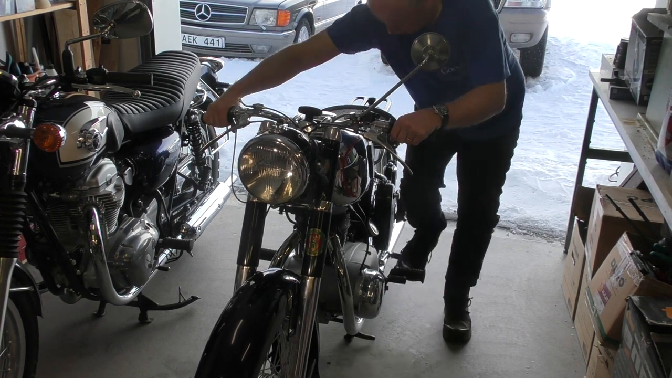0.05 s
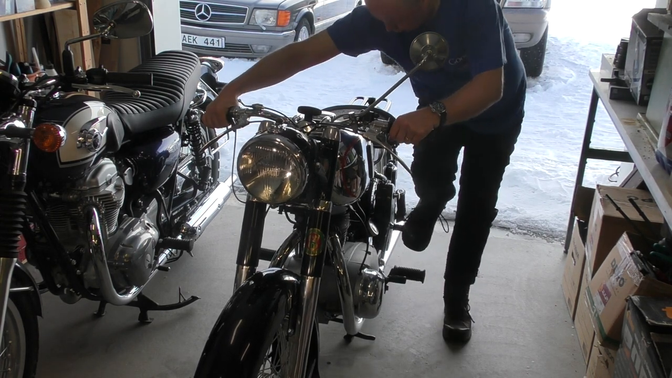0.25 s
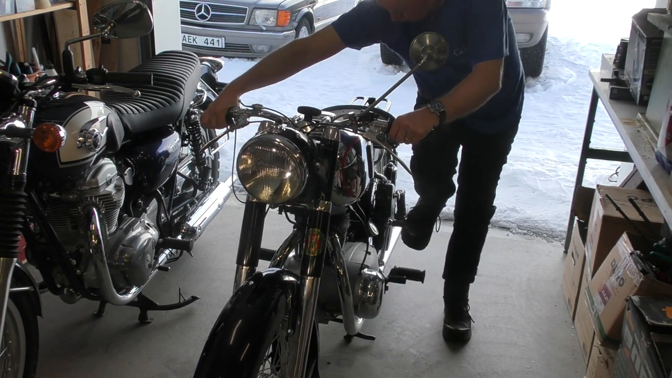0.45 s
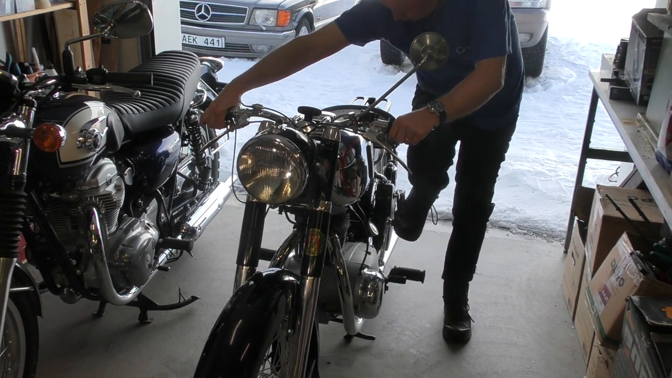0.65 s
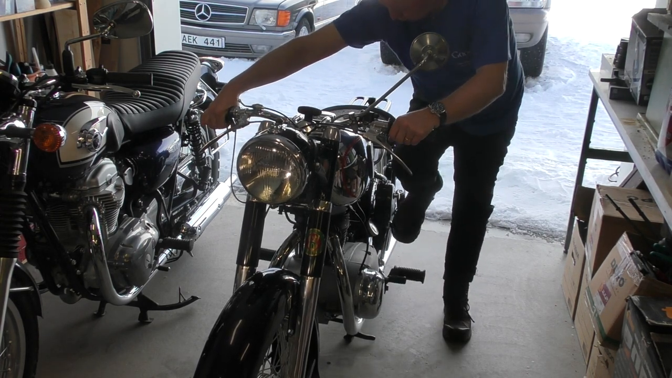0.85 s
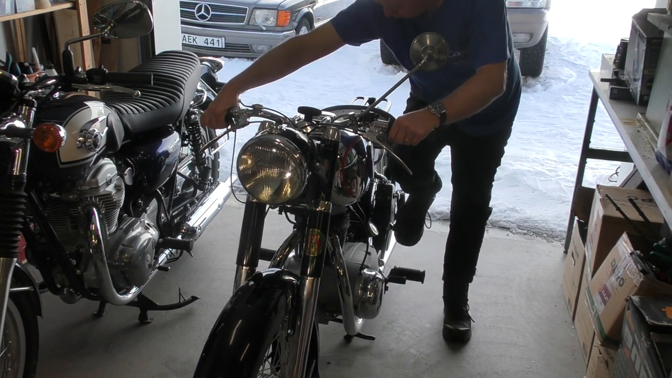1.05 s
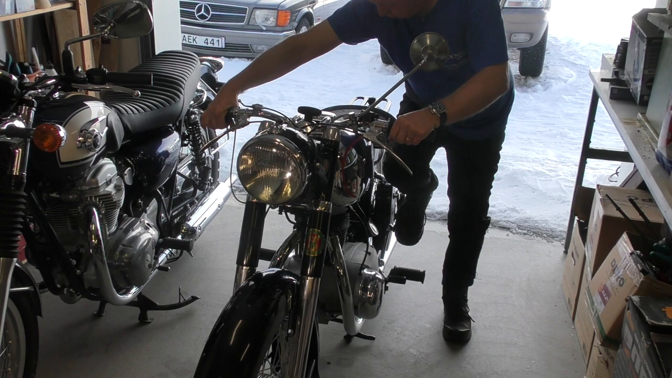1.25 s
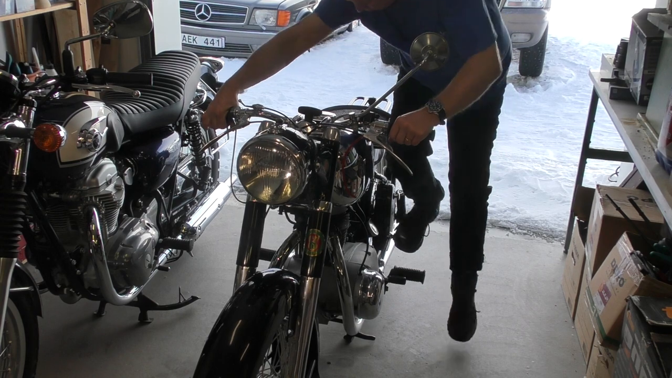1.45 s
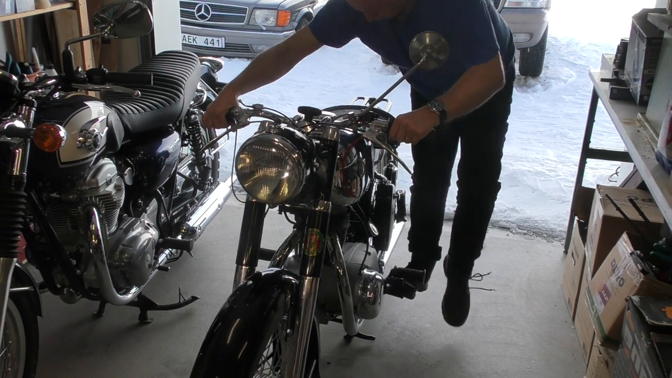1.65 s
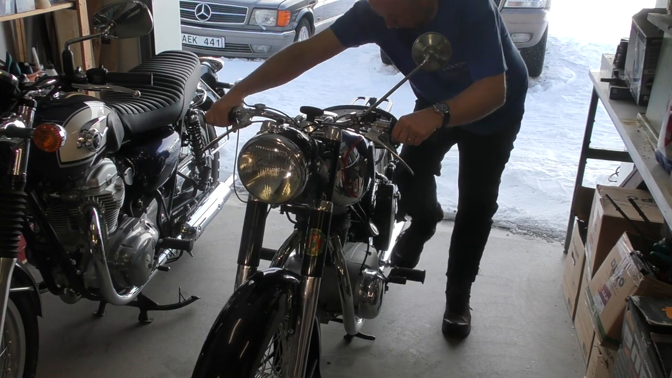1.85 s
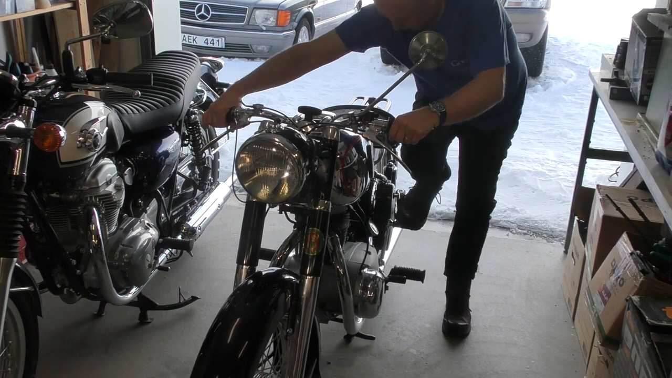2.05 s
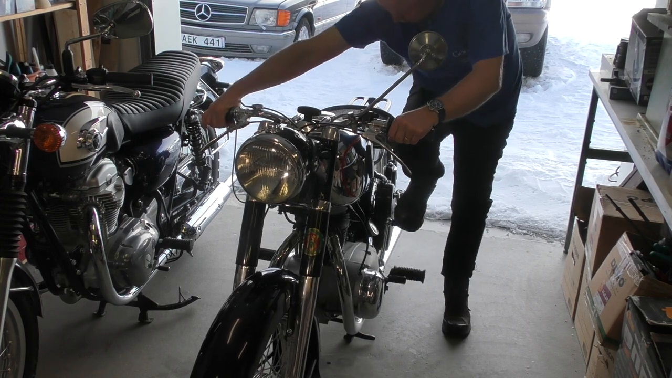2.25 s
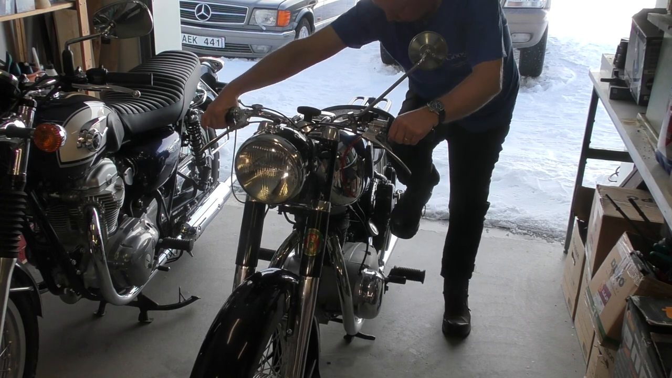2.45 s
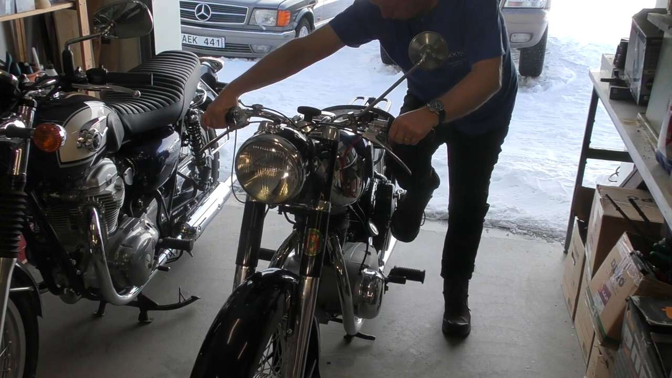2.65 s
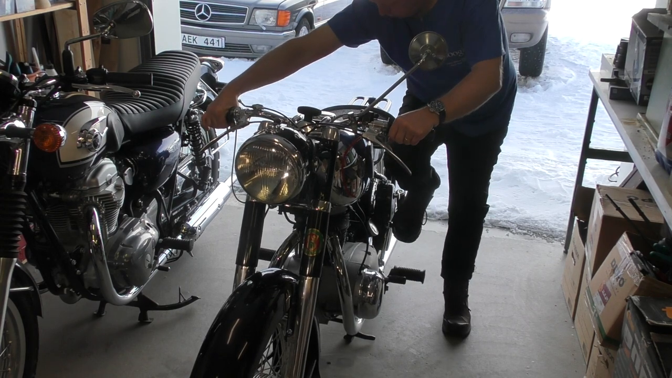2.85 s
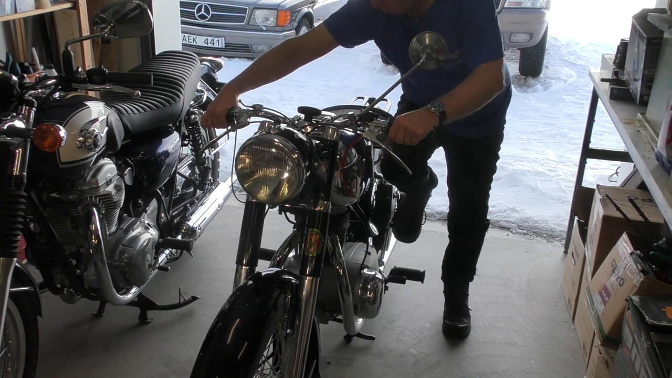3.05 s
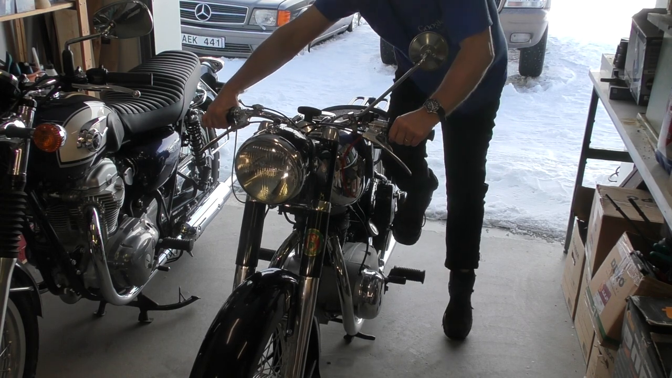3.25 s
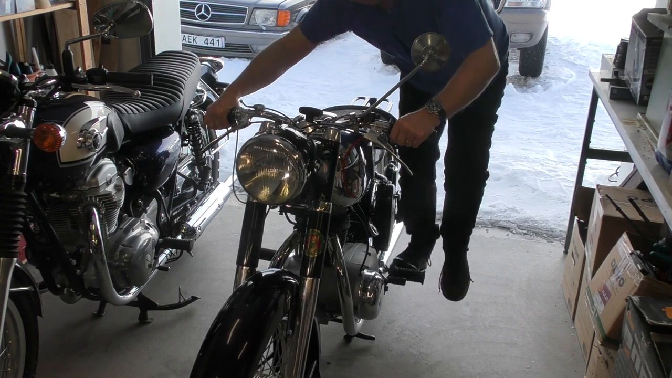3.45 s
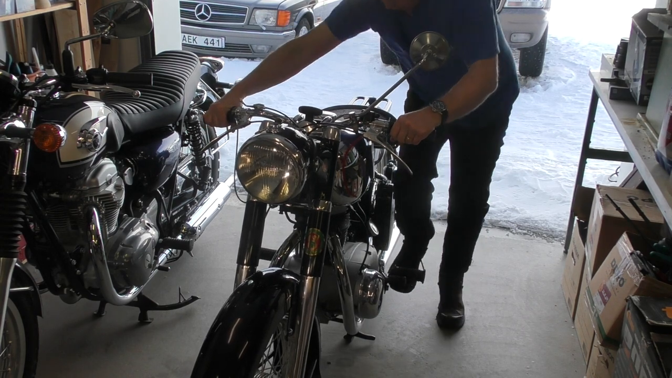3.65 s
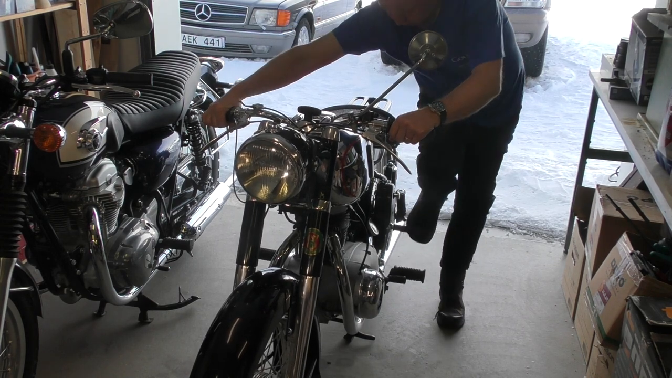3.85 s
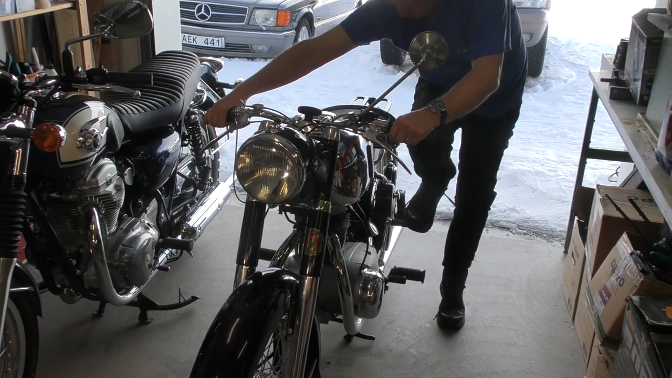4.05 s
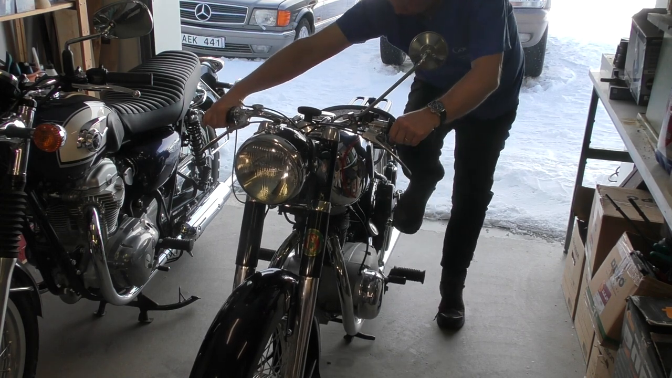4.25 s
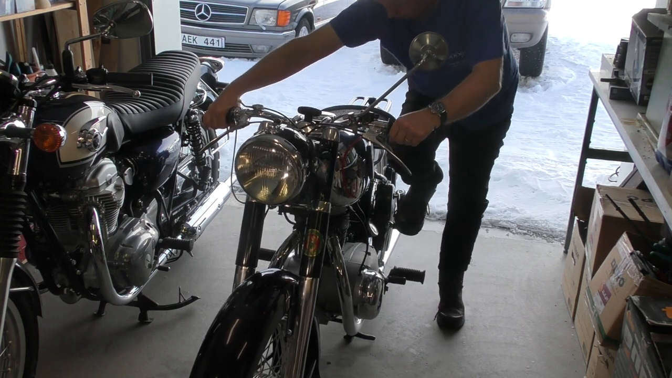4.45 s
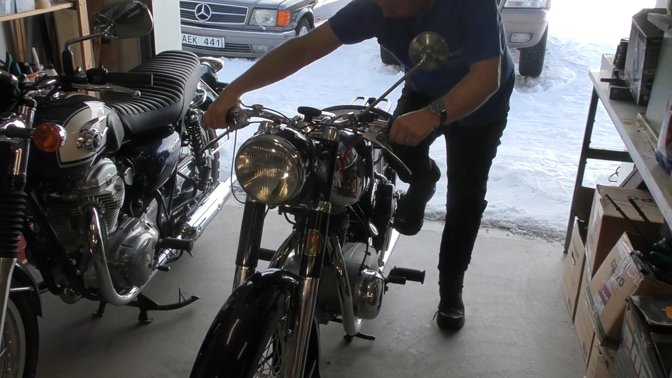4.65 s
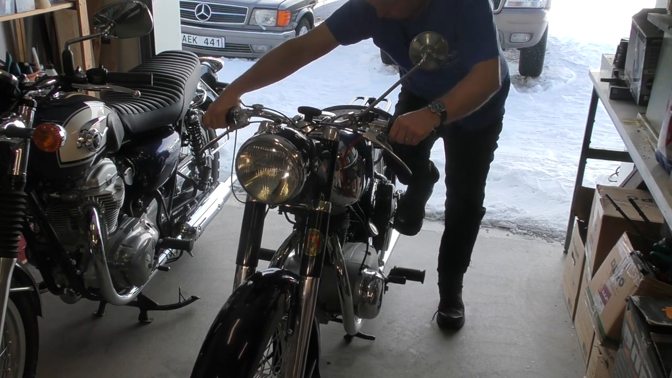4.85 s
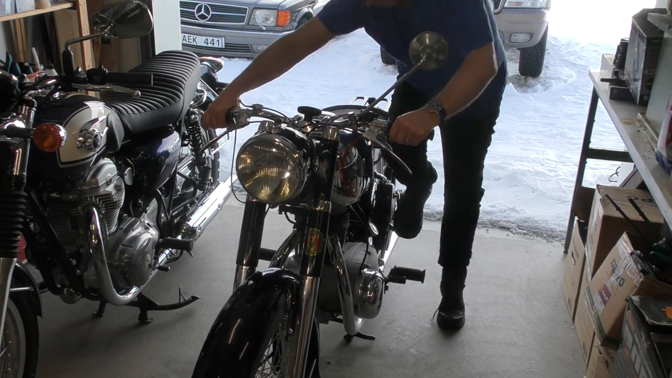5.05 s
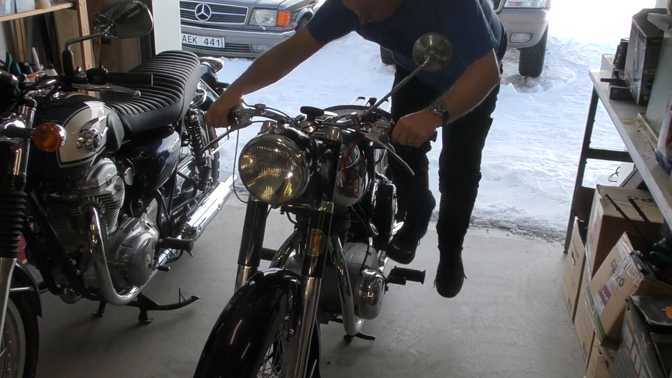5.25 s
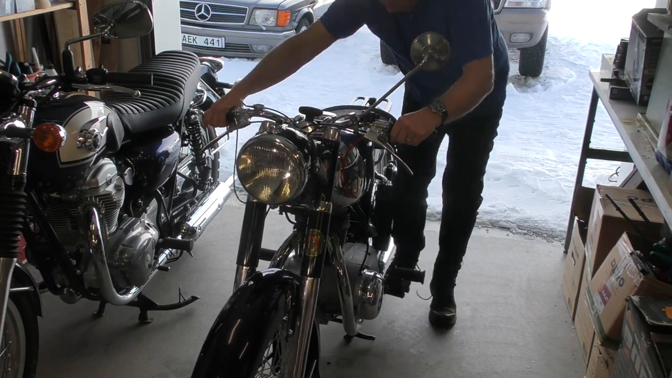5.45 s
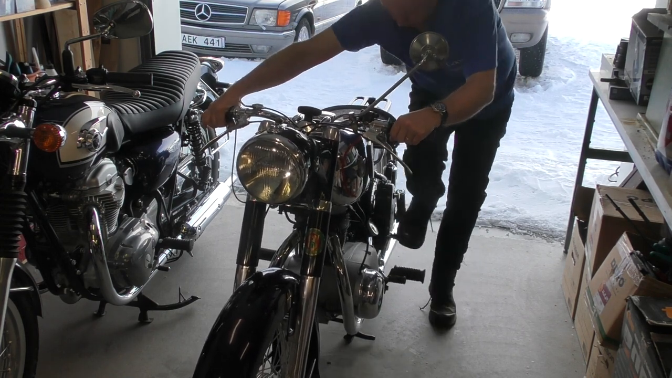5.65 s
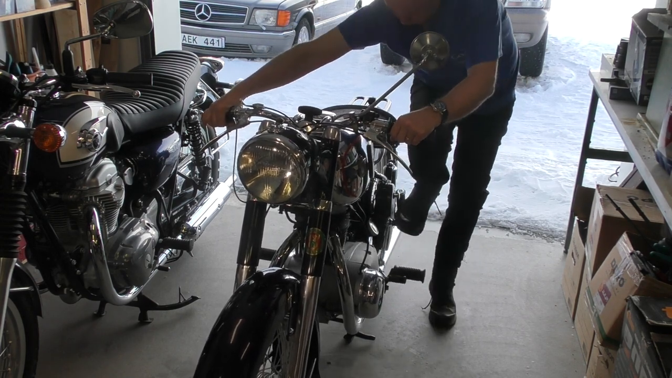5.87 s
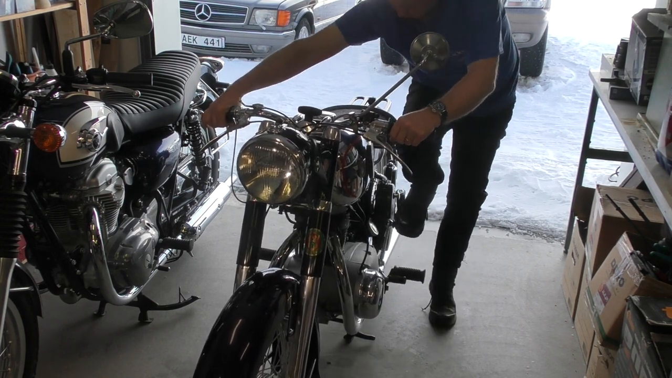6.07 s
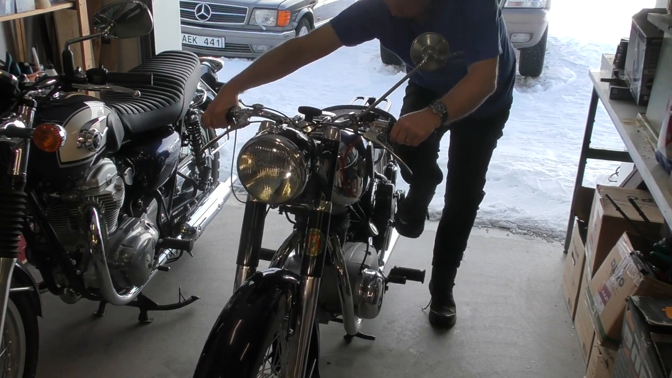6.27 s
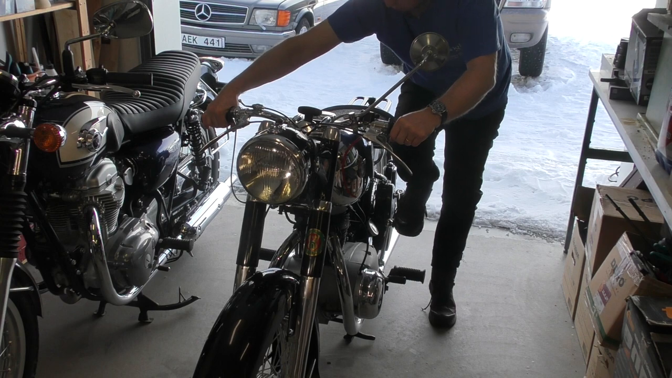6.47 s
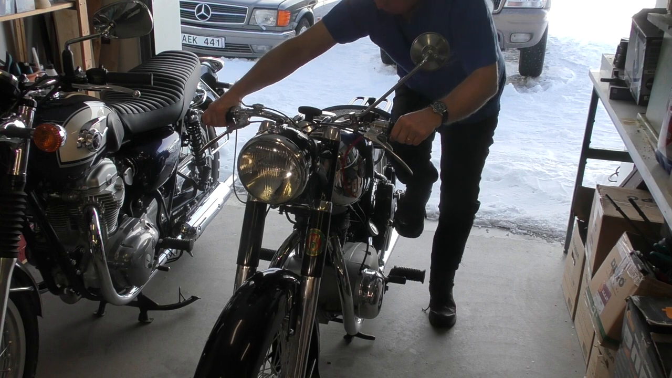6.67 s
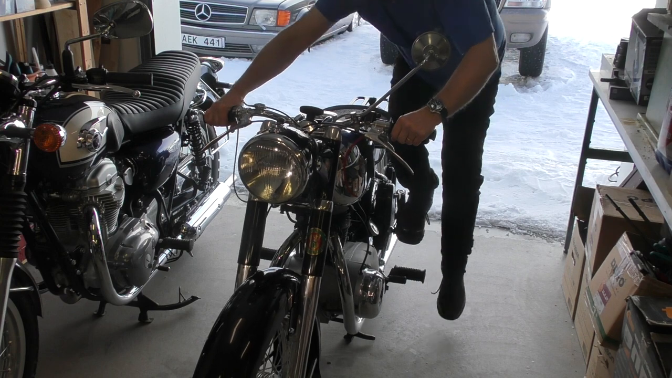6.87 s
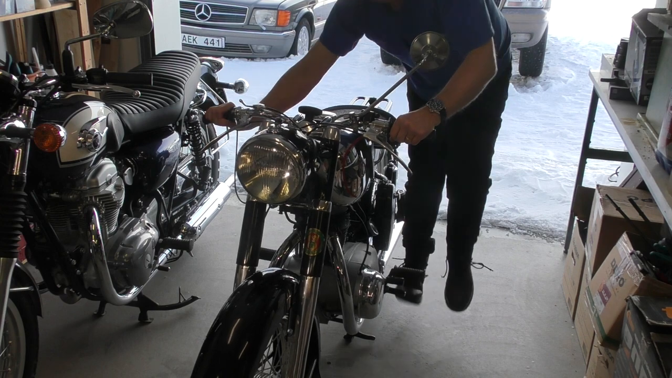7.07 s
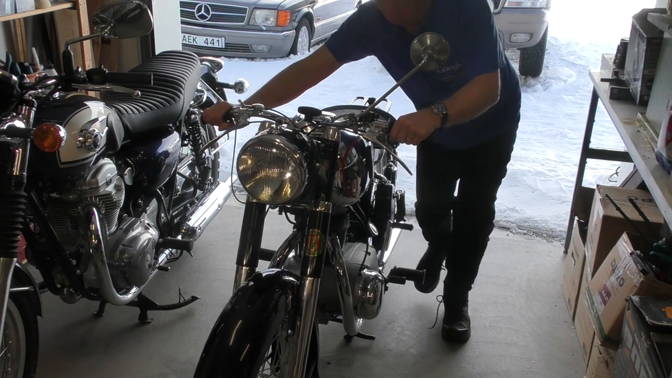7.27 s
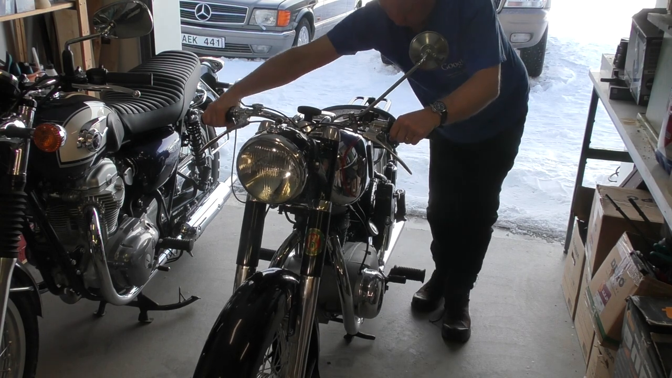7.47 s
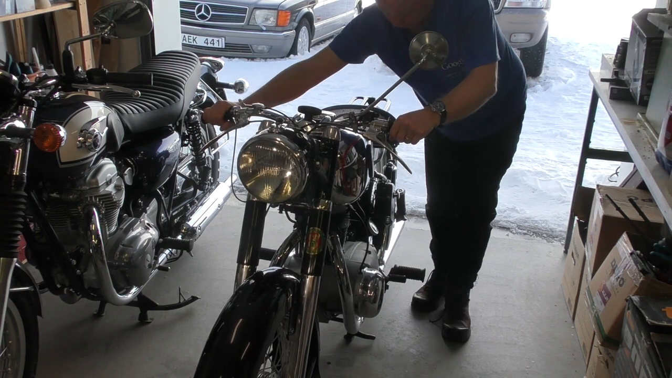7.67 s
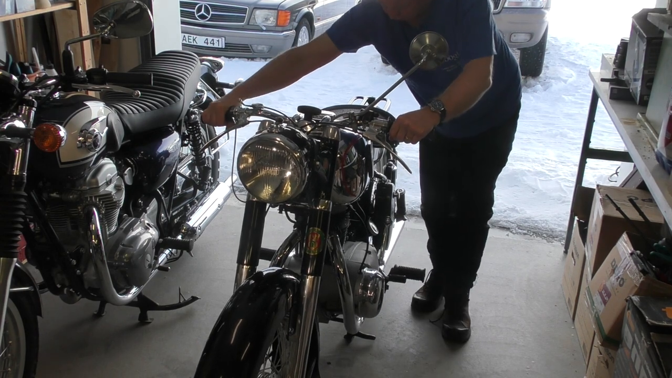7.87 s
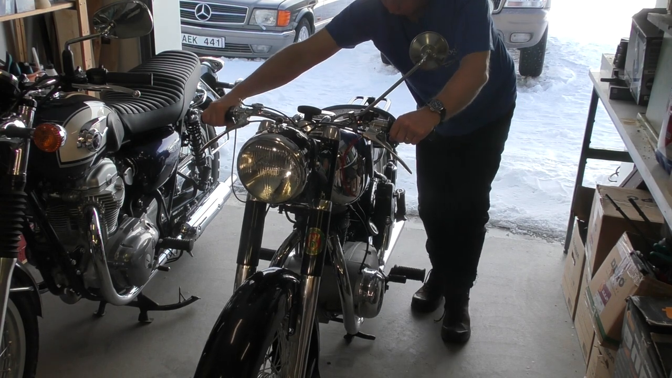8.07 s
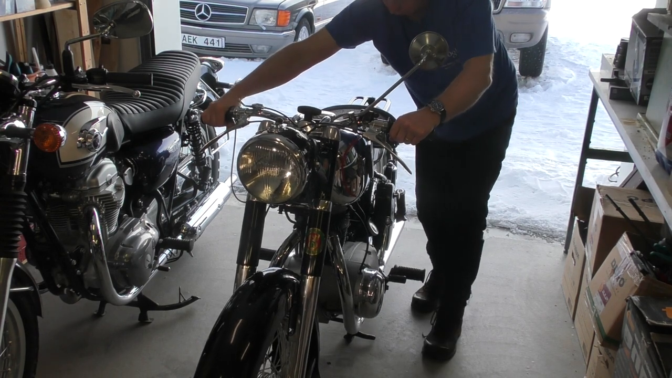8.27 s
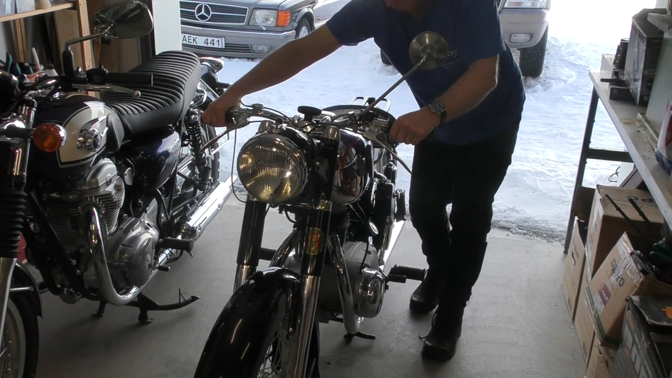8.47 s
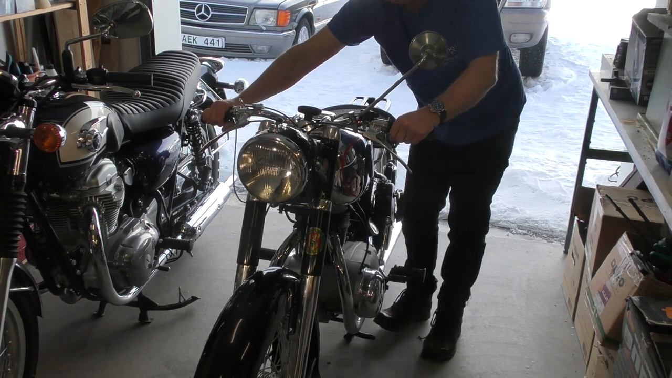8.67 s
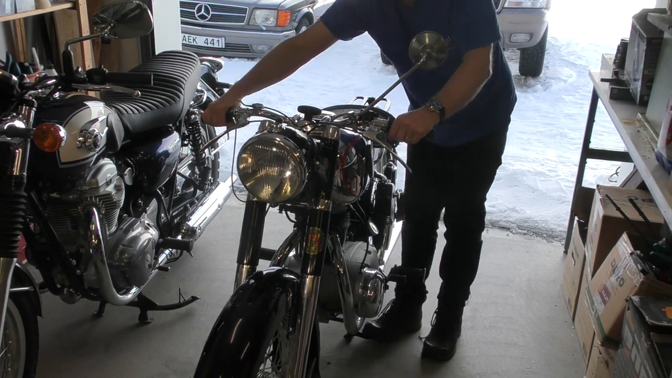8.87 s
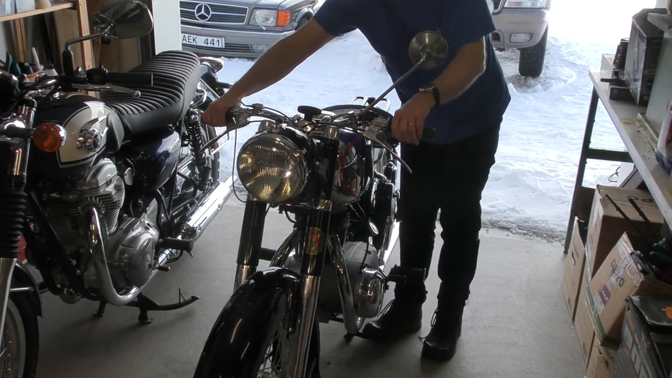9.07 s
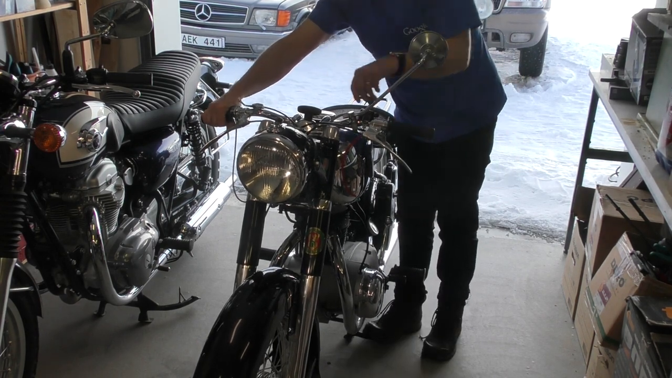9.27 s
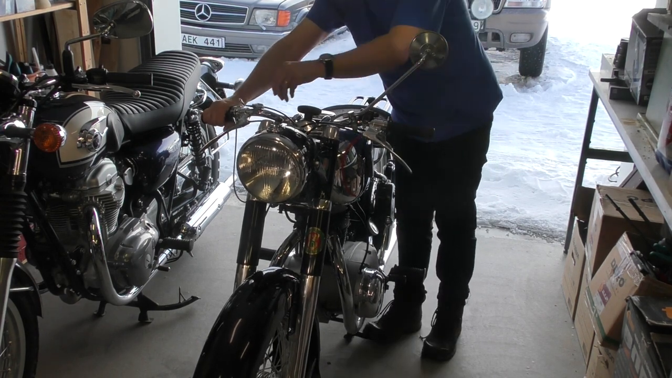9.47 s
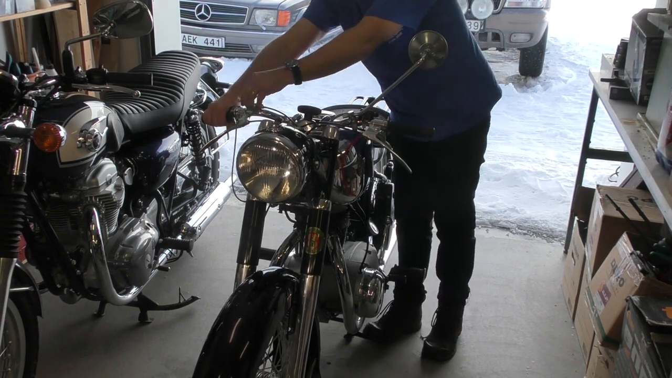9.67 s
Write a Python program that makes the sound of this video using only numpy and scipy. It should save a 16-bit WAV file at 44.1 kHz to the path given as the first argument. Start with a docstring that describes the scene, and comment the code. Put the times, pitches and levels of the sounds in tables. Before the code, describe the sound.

A single-cylinder motorcycle is kick-started close by in a garage, slightly to the left, over a faint low hum. It opens on a rasp of gears and a loud clack as the lever snaps back. A second kick scrapes and ratchets from about 1.5 seconds, with a dull exhaust chuff, ending in a clack and a spring jingle at 2.1. A third follows from 3.3, slamming back at 3.9, and a fourth rasps from about 5.1 to 6. Small knocks and soft thuds fill the pauses. The fifth kick begins near 6.9 seconds with sharp clacks, and the engine fires at about 7.2. From 7.5 it runs, uneven at first, then settling into a quick, thumping idle with clattering valves and mechanical rasp until the end, near 9.7 seconds.

```python
"""Motorcycle kick-start in an open garage.

A single-cylinder engine is kicked over four times and catches on the fifth kick. Lever, ratchet and gears
rasp and knock in the crankcase, the return spring jingles, the valves clatter, the exhaust thumps in three
puffs a firing. A low hum throbs behind; loud clacks make the recorder turn its bass down."""
import sys
import numpy as np
from scipy import signal
from scipy.fft import rfft, irfft, next_fast_len
from scipy.io import wavfile
from scipy.ndimage import uniform_filter1d

SR = 44100
rng = np.random.default_rng(int(sys.argv[2]) if len(sys.argv) > 2 else 0)


def bounce(signal):
    """Save signal as a 16-bit WAV file at the path given by the first command-line argument."""
    frames = np.transpose(np.atleast_2d(signal))
    limited = np.clip(frames, -1, 1)
    pcm = np.round(limited * 32767).astype(np.int16)
    wavfile.write(sys.argv[1], SR, pcm)


N = 428652

# (time [s], blast [dB], suction delay [ms], suction [dB re blast], further delay [ms],
#  last suction [dB re blast])
FIRINGS = [(7.235, -11.5, 12, -7, 11.7, -3), (7.5172, -7.5, 11.7, -10, 11, -7),
           (7.61, -18.5, 12.2, 4, 9.8, -7), (7.6771, -8.5, 11.0, -18, 11, -7.5),
           (7.744, -13.5, 20.5, 0.5, 13, -9), (7.8085, -15, 13, 0.5, 8.2, -3),
           (7.912, -21.5, 13.4, 10.5, 13.7, 11), (7.981, -32, 18.5, 11, 12.5, 8),
           (8.0435, -12.5, 12.4, 0.5, 8.7, -6), (8.101, -14.5, 12.4, 3.5, 8, -4),
           (8.158, -21, 11.5, 8.5, 10, -11), (8.213, -15, 12, 2.5, 10.3, -7),
           (8.2675, -14.5, 11.5, 2, 16, -13), (8.322, -14, 10.9, 3.5, 15, -12),
           (8.374, -15.2, 11.5, 4.5, 15, -11), (8.4274, -23, 11.6, 1, 14.1, -17),
           (8.489, -17, 10, 2, 14, -6), (8.5486, -17.5, 10.2, 3, 13, 1),
           (8.6152, -22.5, 9.4, 8.5, 9.7, -5.5), (8.675, -18.5, 12, 3, 7.7, -8),
           (8.7403, -14, 12.7, -4, 8.5, -2.5), (8.778, -23, 22, 10, 10.8, 11.5),
           (8.8524, -16, 11, 3.5, 15.5, -3), (8.9018, -16.5, 11.1, 0.5, 14.8, -9),
           (8.9486, -26, 10.2, 13, 14.6, 7.7), (9.0024, -20.5, 7.5, 4, 14.2, 3),
           (9.0488, -18.5, 10.2, 0.5, 13.2, -1.9), (9.1006, -18, 10.5, 1.5, 13.7, 1),
           (9.154, -20, 10.8, 2.5, 13.0, -3), (9.2044, -22.5, 12.8, 3, 4.5, 7),
           (9.269, -21, 10.7, 3.5, 13, -1), (9.33, -23, 11.2, 2.5, 13.5, -2),
           (9.3899, -24, 12, 5.5, 4.3, 4), (9.4603, -25, 11.8, 4, 11.5, 2), (9.5232, -21, 17.5, 4, 18, -3),
           (9.589, -13.5, 17.7, 1, 19, -11.1), (9.6491, -14, 12.3, 2, 9.8, -4.5),
           (9.7031, -16, 10.7, -0.5, 12.0, -8.0)]
# engine under power: (time [s], rasp [dB], treble [dB re rasp], pipe rumble [dB], valve clatter [dB])
RUNNING = [(7.5, -36.5, -0.5, -12, -20.5), (7.74, -35.5, 1.5, -9.5, -20), (7.95, -33, -4, -6.5, -21.5),
           (8.17, -32, -4, -10.5, -26.5), (8.62, -31.5, -8.5, -20, -32), (8.72, -30, 0.5, -5.5, -23.5),
           (8.94, -32.5, -5, -13.5, -29), (9.4, -31.5, -9, -14, -34), (9.55, -32, -1.5, -8.5, -20),
           (9.72, -35, 0.5, -8.5, -24.5)]
# lever slams home: (time [s], sizzle [dB], spring jingle [dB], first jingle pitch [Hz], arm ring [dB])
SLAMS = [(0.15, -23.5, -33, 12500, -39), (2.145, -22.5, -9, 11700, -41.5),
         (3.933, -21.5, -15, 11100, -40.5)]
# spectra of scraping metal, its hiss and pumped air: (frequency [Hz], density [dB])
RASP = [(280, -32.5), (480, -10.5), (777, -10.5), (1350, -0.5), (1950, -5), (2500, 0.5), (3160, -4.5),
        (3780, -3), (7000, -13.5), (9100, -37.5), (15400, -120)]
TREBLE = [(3530, -10.5), (6000, -3.5), (7340, -4), (8000, -1), (11400, -4.5), (15000, -11), (16000, -0.5)]
AIR = [(18, -39.5), (30, -26.5), (54, -6.5), (81, -12), (141, -6), (312, -3), (369, -4.5), (425, -2),
       (602, -18.5), (650, -16.5), (840, -33), (1430, -120)]


def exhaust():
    """A firing is a blast and two suctions, a chuff one puff; puffs and gas flow ring the pipe."""
    # compression while turned over: (time [s], level [dB], deep part [dB re level])
    chuffs = [(1.773, -14, -22), (3.423, -36, -33), (3.663, -20, -30.5), (3.76, -27, -38),
              (3.83, -26.5, -40), (5.327, -31.5, -35), (5.493, -13, -33), (5.729, -31, -40),
              (7.137, -16.5, -16)]
    pipe_modes = [(74.8, 6.1, 2.5), (148, 37, 1), (214.5, 43, 2)]  # (frequency [Hz], width [Hz], gain [dB])
    silencer_ring = [(7.2, 0), (7.7, -1), (8.4, -0.5), (8.9, 0), (9.2, 1.5), (9.33, 8.5), (9.5, 9.5),
                     (9.56, -0.5), (9.72, -1)]  # (time [s], gain [dB])
    s, blast_db, suck_ms, suck_db, last_ms, last_db = np.transpose(FIRINGS)
    chuff_s, chuff_db, deep_db = np.transpose(chuffs)
    impulses, thump = (puffs(s, blast_db, hz=256.5) + puffs(chuff_s + .004, chuff_db, hz=256.5)
                       - puffs(s + suck_ms / 1000, blast_db + suck_db, hz=226.4)
                       - puffs(s + (suck_ms + last_ms) / 1000, blast_db + last_db, hz=209))
    ring_db, = in_time(silencer_ring)
    silencer = from_db(ring_db) * resonate(thump, 248, 24.4)
    catch = [(chuff_s[-1] - .03, -70), (chuff_s[-1], -13)]
    rumble_db, = in_time(catch + [(row[0], row[3]) for row in RUNNING])
    surge = .3 + bursts(s, 0, .25, .006)  # gas rushes out after each firing
    flow = from_db(36) * butter(impulses, 4, 380) + from_db(rumble_db - 17) * surge * noise(AIR)
    pipe = sum(from_db(db) * resonate(flow, hz, width) for hz, width, db in pipe_modes)
    heaves = np.zeros(N)
    heaves[np.round(chuff_s * SR).astype(int)] = from_db(chuff_db + deep_db)
    deep = from_db(54) * resonate_twice(heaves, 55, 30)
    return from_db(-1.5) * thump + silencer + pipe + deep + drone(surge)


def puffs(times_s, levels_db, hz):
    """Gas puffs as (impulses, rounded wavelets); a harder puff is sharper."""
    impulses, wavelets = out = np.zeros((2, N + SR))
    offsets = np.arange(-SR // 50, SR // 50 + 1)
    for s, db in zip(times_s, levels_db):
        centre = round(s * SR)
        cycles = hz * 2 ** (.07 * (db + 15)) * offsets / SR
        window = np.exp(-(cycles / .56) ** 2 / 2)
        impulses[centre] += from_db(db)
        wavelets[centre + offsets] += from_db(db) * window * np.cos(2 * np.pi * cycles)
    return out[:, :N]


def drone(surge):
    """Gas blows two narrow tones in the pipe."""
    levels = [(7.1, -100, -90), (7.14, -29, -60), (7.24, -31.5, -58), (7.33, -30, -55), (7.389, -47, -55),
              (7.43, -32.5, -42), (7.5, -39, -41), (7.57, -30, -40), (7.64, -29, -36), (7.7, -43, -40.5),
              (8.9, -37.5, -39.5), (9.05, -47, -32), (9.48, -45, -40.5), (9.6, -48, -39.5)]  # (time [s], low tone [dB], high tone [dB])
    low_db, high_db = in_time(levels)
    low_hz = 240.8 + 12 * drift(8)
    low = np.sqrt(2) * np.sin(2 * np.pi * np.cumsum(low_hz) / SR)
    high = rms_one(resonate_twice(rng.standard_normal(N), 386.6, 36))
    return from_db(low_db + 1.5 * drift(25)) * low + from_db(high_db) * surge * high


def crankcase():
    """Gear teeth, lever knocks and ratchet slips shake the case and ring its modes."""
    # one curve a kick: (time [s], rasp [dB], treble [dB re rasp], pumped air [dB re rasp])
    kicks = [
        [(0.0, -30.5, 1, -5), (0.1, -33, -8, 8), (0.15, -32, 2, 0), (0.21, -49, 2.5, -22),
         (0.46, -56.5, -0.5, 1), (1.12, -60, -10, 8)],
        [(1.5, -54.5, -1, -4), (1.59, -39.5, 6, 0), (1.65, -29, -3.5, 2), (1.73, -28.5, -6, -5),
         (1.77, -28, -5.5, 6), (1.88, -30.5, -0.5, -6), (2.0, -28.5, -5, 2), (2.13, -37.5, -21, -1),
         (2.34, -51.5, 2.5, -6), (2.78, -62, -28, 7.5)],
        [(3.26, -48.5, -4.5, 1), (3.34, -42, -2.5, -11.5), (3.47, -39, 1, 8), (3.535, -41.5, 7, 8),
         (3.565, -23.5, 7.5, -2), (3.63, -31.5, -10.5, 2), (3.72, -29, 5, 2.5), (3.82, -29, -5, -1),
         (3.87, -36.5, -2.5, 10), (3.97, -34.5, 9.5, -10), (4.22, -57, -2.5, -0.5), (4.74, -58.5, -8.5, 4.5)],
        [(4.99, -55, -7, 1), (5.12, -40.5, -2.5, -9), (5.23, -50.5, 0, -1), (5.27, -31.5, -6, 0),
         (5.39, -39, 0, 7.5), (5.54, -30.5, -6, 4), (5.58, -28.5, -0.5, -1), (5.71, -33, -2.5, 1),
         (5.8, -28, -6.5, -5), (5.85, -37, 0.5, 2), (5.9, -28.5, 4.5, -21), (5.97, -37.5, -0.5, -12),
         (6.1, -61.5, -13.5, 10), (6.33, -66.5, -18, 10)],
        [(6.8, -61, -7, 7), (6.92, -35.5, -1, -11), (7.04, -32.5, -3, -1.5), (7.1, -37.5, 1, 10),
         (7.21, -29.5, -9.5, 1), (7.31, -30.5, -6, 5.5), (7.4, -32.5, -10.5, 0.5), (7.46, -30, 5, 3),
         (7.5, -26.5, -1, 6.5)],
    ]
    # both: (time [s], level [dB], treble offset [dB], thud offset [dB], case pitch [Hz])
    knocks = [(0.149, 2.5, -3.5, -14, 3630), (0.4758, -57, 1, -28, 1420), (0.571, -46.5, -2, -17, 2120),
              (0.631, -40, -9, -8, 2520), (0.787, -46, 3, -7, 1380), (0.8594, -23.5, -6, -7, 1430),
              (0.997, -33, -46, -17, 2550), (1.1757, -49, 7.5, -26, 1940), (1.3295, -46, -34, -3, 1394),
              (1.672, -16, -2.5, -29, 3580), (1.701, -15, -30, -14, 2320), (2.1445, -6, -3, -22, 3440),
              (2.4495, -32, -9, -12.5, 1360), (2.6385, -19, -26, -16.5, 1790),
              (3.547, -21.5, 3.5, -35.5, 2780), (3.581, -4.5, -41, -22, 2690), (3.93, -7, -1, -19.5, 3420),
              (4.249, -42.5, -7, -22.5, 2370), (4.3016, -42, 1, -6, 1620), (4.3676, -31.5, -9, -14.5, 1420),
              (4.405, -30, -14, -7.5, 3750), (4.627, -39, -10, -18, 1340), (4.642, -39, 1, -17, 1300),
              (4.79, -43, -29, -15.5, 1390), (5.1994, -24.5, -1.5, -34.5, 1850),
              (5.4216, -10.5, 0.5, -24, 3600), (5.436, -7.5, -16, -19, 3740), (5.725, -21.5, -34, -11, 500),
              (6.105, -33, -40, -19, 2690), (6.158, -39.5, -21.5, -19, 2390),
              (6.195, -44, -29.5, -20.5, 2590), (6.585, -55, -24, -20, 3000),
              (6.606, -38.5, -11, -17, 1417), (6.769, -43, -7.5, -15, 3400), (6.815, -39.5, -29, 2.5, 1340),
              (7.03, -23, -14, -5.5, 3370), (7.101, -7.5, 0, -22, 3460), (7.115, -7.5, -16, -26, 2550),
              (7.2352, -18, -9, -5, 3760), (7.454, -22.5, 4.5, -26, 2190)]
    slips = [(1.535, -27, -8.5, -19, 2290), (1.859, -21, -2.5, -29, 2560), (2.07, -24, -7, -19, 2460),
             (3.441, -16, -2.5, -36, 2580), (3.873, -24.5, 9, -28, 2300), (5.328, -17.5, -1.5, -22, 3120),
             (5.839, -18.5, -6.5, -34, 3000), (5.875, -31, -3, -35, 3100), (5.921, -30, -9, -38, 3100),
             (6.883, -31.5, -30, -21, 2600), (7.34, -13, -15, -21, 2960), (7.371, -20, -13, -26, 3840)]
    case_modes = [(1280, 1100, -5), (1563, 100, 2.5), (1830, 130, -5), (2355, 148, 3.5), (2500, 490, -9),
                  (2990, 170, 4), (3380, 290, -9.5), (3760, 260, 1), (4470, 820, 2), (4510, 140, 10.5),
                  (5830, 350, -19.5)]  # (frequency [Hz], width [Hz], gain [dB])
    rasp_db, treble_db, air_db = in_time([*sum(kicks, []), (kicks[-1][-1][0] + .096, -90, 0, 0)])
    s, peak_db, bright_db, thud_db, knock_hz = np.transpose(sorted(knocks + slips))
    slam_s, slam_db = np.transpose(SLAMS)[:2]
    slip = np.isin(s, np.transpose(slips)[0])
    t60_s = np.where(slip, .16, .033 - .0023 * peak_db)  # softer knocks are looser and last longer
    rise_s = np.where(slip, .016, .0031)

    metal = from_db(2.26 * drift(220)) * noise(RASP)  # teeth meet unevenly
    teeth = from_db(rasp_db - 3.5) * metal
    blows = bursts(s, peak_db - 5, t60_s, rise_s) * metal
    teeth_hz = 2720 * 2 ** (.37 * treble_db)  # a brighter scrape rings the case higher
    struck_hz = knock_hz[latest(s)]
    rings = 0
    for k, (hz, width, db) in enumerate(case_modes):
        drive = teeth * coupling(hz, teeth_hz, 12) + blows * coupling(hz, struck_hz, 17)
        rings += (-1) ** k * from_db(db + 1.5 * drift(8)) * resonate(drive, hz, max(width, 220.5))

    sizzle = from_db(rasp_db + treble_db - 4) + bursts(s, peak_db + bright_db, .9 * t60_s, rise_s)
    sizzle += bursts(slam_s, slam_db, .33, .006)
    hiss = from_db(1.9 * drift(130)) * sizzle * noise(TREBLE)
    rub = bursts(s[slip], (peak_db + bright_db)[slip] + 14, t60_s[slip], rise_s[slip]) * noise(TREBLE)
    shrill = housing(hiss, rub)
    crack_db = peak_db + .41 * bright_db - 14.5  # bare metal on metal
    crack = bursts(s + .0023, crack_db, 2 * t60_s, rise_s) * rng.standard_normal(N)
    frame_shudder = bursts(s + .003, .81 * peak_db - 23.5, 2.4 * t60_s, rise_s) * noise(RASP)
    singing = case_singing(rasp_db)
    body = hollow_knocks(s, .64 * peak_db - 21.5, 1.9 * t60_s, rise_s, knock_hz, width_ratio=.45)
    thuds = bursts(s, peak_db + thud_db - .5, 1.6 * t60_s, rise_s + .00088)
    air = (from_db(rasp_db + air_db - 9) + thuds) * noise(AIR)
    return (from_db(-4) * (teeth + blows) + from_db(6) * rings + from_db(-2.5) * hiss
            + from_db(-1.5) * shrill + crack + frame_shudder + singing + body + air)


def housing(hiss, rub):
    """Bright scraping and ratchet slips ring the ratchet and spring housing."""
    modes = [(6680, 90, -3), (7210, 140, -3), (7600, 90, -2.5), (8840, 120, -5), (10200, 490, -4.5),
             (11500, 250, -6)]  # (frequency [Hz], width [Hz], gain [dB])
    return sum(from_db(db + 5.9 * drift(9.8)) * resonate(hiss + coupling(hz, 7200, 30) * rub, hz, width)
               for hz, width, db in modes)


def case_singing(rasp_db):
    """Passing teeth set single case resonances singing."""
    stretches = [(0, 0.07, -5.5, 2480), (0.107, 0.037, -3, 4760), (1.549, 0.092, -2, 4300),
                 (1.55, 0.085, -8, 2280), (1.572, 0.11, -10, 1300), (1.701, 0.16, -3.5, 2460),
                 (1.794, 0.13, -1.5, 4650), (1.938, 0.042, -2, 3260), (2.08, .06, -2.5, 4570),
                 (3.301, 0.15, -7, 1310), (3.33, 0.13, -7, 4460), (3.696, .1, -6.5, 2380),
                 (3.728, 0.096, -6, 1790), (3.879, 0.046, -2, 2270), (5.068, .12, -9, 4560),
                 (5.072, 0.11, -7, 2200), (5.26, .1, -5, 2300), (5.33, 0.044, 5.5, 3140),
                 (5.337, 0.027, 5, 6650), (5.337, 0.027, 6, 7550), (5.338, 0.027, 2, 8740),
                 (5.42, .02, 11, 9500), (5.199, .025, 9, 2510), (5.85, 0.12, -5, 4160),
                 (1.67, 0.032, 2, 3800), (3.445, 0.052, 8, 7200), (7.382, 0.025, 2, 3900),
                 (5.499, 0.14, -10, 2320), (5.76, 0.079, -8, 2320), (5.769, .17, -8.5, 1270),
                 (5.839, 0.17, 1, 3070), (5.858, 0.1, -2, 7240), (5.86, 0.1, -5, 6800),
                 (6.874, 0.13, -4, 4570), (6.882, 0.1, -1.5, 2320), (6.878, 0.14, -12, 1280)]  # (time [s], nominal length [s], level [dB re rasp], pitch [Hz])
    out = np.zeros(N + SR)
    for s, length_s, db, hz in stretches:
        start, size = round(s * SR), min(round(1.215 * length_s * SR), SR // 4)
        span = slice(start, start + size)
        envelope = np.hanning(size) ** .25 * from_db(rasp_db[span] + db - 2.5)
        out[span] += band_noise(envelope, hz, min(.16 * hz, 600))
    return out[:N]


def valves():
    """Tappets and chain clatter with each blast and first suction and ring the covers."""
    covers = [(630, 210, 2.5), (1460, 110, -4.5), (2920, 69, 1.5), (3770, 170, -4), (4840, 88, 1),
              (6240, 81, -6.5)]  # (frequency [Hz], width [Hz], gain [dB])
    s, blast_db, suck_ms, suck_db = np.transpose(FIRINGS)[:4]
    silent_start = (RUNNING[0][0] - .03, -90, *RUNNING[0][2:])
    rasp_db, treble_db, _, clatter_db = in_time([silent_start, *RUNNING])
    tap_db = clatter_db[np.round(s * SR).astype(int)] + .64 * (blast_db - blast_db.mean())
    clatter = bursts(s - .005, tap_db - 7, .11, .004)
    clatter += bursts(s + suck_ms / 1000 - .004, tap_db + 1.2 * suck_db - 16, .11, .004)
    metal = from_db(1.2 * drift(150)) * (clatter + from_db(rasp_db - 5)) * noise(RASP)
    hiss = (from_db(.55 * treble_db - 3) * clatter + from_db(rasp_db + treble_db - 4.5)) * noise(TREBLE)
    rings = sum(from_db(db + 2 * drift(4.6)) * resonate(metal, hz, width) for hz, width, db in covers)
    return from_db(-1.3) * metal + from_db(-3.5) * rings + hiss


def spring():
    """Coils chatter in quick uneven ticks that ring the spring's modes, ever lower."""
    modes = [(8700, -18.5, 0.19), (9430, -13, 0.18), (9400, -15, 0.31), (9760, 0, 0.23), (8700, -9, 0.32),
             (9300, -0.5, 0.41), (10000, -2.5, 0.097), (11740, -5, 0.11), (10950, -10.5, 0.27),
             (12500, 9.5, 0.11), (11240, 4, 0.19), (13800, -5.5, 0.24)]  # (frequency [Hz], gain [0.1 dB], relative ring time [-])
    s, _, jingle_db, first_hz, _ = np.transpose(SLAMS)
    end_hz, fall_s = 9350, .034
    slam = latest(s)
    age_s = np.maximum(np.arange(N) / SR - s[slam], 0)
    coil_hz = end_hz + (first_hz[slam] - end_hz) * np.exp(-(age_s / fall_s) ** 6)
    ticks = (rng.random(N) < 1500 / SR) * from_db(1.5 * drift(120))
    rings = 0
    for hz, gain, ring_time in modes:
        mode = rms_one(resonate(ticks * rng.uniform(-.89, 1, N), hz, 36 / ring_time))
        rings += from_db(.1 * gain) * coupling(hz, coil_hz, 66) * mode
    shake = bursts(s, jingle_db, t60_s=.1, rise_s=.006)
    swing_back = bursts(s + .028, jingle_db - 14.5, t60_s=.35, rise_s=.0086)
    return (shake + swing_back) * rings


def lever():
    """The arm rings on after it slams home."""
    modes = [(3060, 44, -1), (3540, 47, 0), (4410, 100, -4), (5800, 39, -3), (6630, 37, -4)]  # (frequency [Hz], nominal width [Hz], level [dB])
    s, *_, ring_db = np.transpose(SLAMS)
    rings = sum(from_db(db) * rms_one(resonate(rng.standard_normal(N), hz, 2.5 * width))
                for hz, width, db in modes)
    return bursts(s, ring_db, t60_s=.45, rise_s=.006) * rings


def valve_ticks():
    """The loudest valve ticks each ring one cover."""
    ticks = [(7.5153, -18, 2780), (7.6081, -25, 2970), (7.6734, -15.5, 3630), (7.7477, -19, 2800),
             (7.8096, -22, 4140), (7.8824, -22, 3550), (7.9273, -16, 3680), (8.0471, -14, 2450),
             (8.1019, -17, 2150), (8.1653, -25, 2440), (8.2112, -19, 2290), (8.2656, -21, 2990),
             (8.3249, -20, 4290), (8.3738, -23, 2480), (8.4317, -22, 2420), (8.498, -28, 2550),
             (8.6796, -22, 2850), (8.7475, -17.5, 2800), (8.7984, -19, 2640), (8.8522, -20, 2200),
             (8.9011, -22, 3720), (8.949, -21, 2330), (9.0009, -21, 2990), (9.0563, -23, 3020),
             (9.2124, -20, 2990), (9.5292, -18, 3780), (9.5881, -18, 2420), (9.6464, -20, 3890),
             (9.7008, -19, 2170)]  # (time [s], level [dB], pitch [Hz])
    s, db, hz = np.transpose(ticks)
    return hollow_knocks(s, db - 9, t60_s=.072, rise_s=.0033, pitch_hz=hz, width_ratio=.14)


def garage(x, wet_db, side_db):
    """Diffuse stereo echoes; each octave has its own decay and width."""
    decay = [(60, 0.25), (500, 0.098), (1400, 0.081), (3700, 0.38), (10000, 0.033), (16000, 0.065)]  # (frequency [Hz], T60 [s])
    stereo_width = [(60, -15), (110, -16), (200, -21), (380, -17), (700, -11), (1290, -7), (2380, -7),
                    (4400, -9), (8120, -14), (15000, -4)]  # (frequency [Hz], side level [dB])
    age_s, size = np.arange(SR // 2) / SR, next_fast_len(N + SR // 2)
    echoes = 0
    for hz in 45 * 2 ** np.arange(9):
        edges_hz = [hz / np.sqrt(2), hz * np.sqrt(2)]
        tail = butter(rng.standard_normal((2, len(age_s))), 2, edges_hz, "band")
        tail *= strike(age_s, 0, at_hz(decay, hz), rise_s=.0024)
        tail /= np.sqrt(np.sum(tail ** 2, axis=1, keepdims=True) * SR / hz)  # even energy per Hz
        echoes += tail * from_db([[wet_db], [side_db + at_hz(stereo_width, hz)]])
    mid, side = irfft(rfft(x, size) * rfft(echoes, size), size)[:, :N]
    return mid + side * [[1], [-1]]


def background():
    """Two close tones beat as a wavering hum over outdoor and microphone noise."""
    tones = [(100, -56), (109, -74)]  # (frequency [Hz], rms level [dB])
    # noise floor: (frequency [Hz], density [dB])
    floor_mid = [(15, -50.5), (25, -22), (43, -26), (72, -5), (102, 1.5), (180, -16), (394, -7.5),
                 (545, -38.5), (754, -15), (840, -17), (1440, -14), (1740, -15.5), (6050, -38),
                 (12200, -26), (16000, -34.5)]
    floor_side = [(15, -41.5), (25, -9), (145, 2.5), (463, -12), (624, -18.5), (1400, -9), (4870, -19),
                  (6380, -52), (10700, -23), (16000, -19.5)]
    t = np.arange(N) / SR
    hum = 0
    for hz, db in tones:
        amplitude = np.sqrt(2) * from_db(db + 1.076 * drift(3.7))
        hum += amplitude * np.sin(2 * np.pi * hz * t + .34 * drift(.46))
    return hum + from_db(-57.5) * (noise(floor_mid) + from_db(-6) * noise(floor_side) * [[1], [-1]])


def from_db(db):
    return 10 ** (np.asarray(db) / 20)


def rms_one(x):
    return x / np.sqrt(np.mean(x ** 2) + 1e-20)


def in_time(rows):
    """Columns of a curve at every sample."""
    s, *columns = np.transpose(rows)
    return [np.interp(np.arange(N) / SR, s, c) for c in columns]


def latest(times_s):
    """Index of the latest event at every sample."""
    return np.maximum(np.searchsorted(times_s, np.arange(N) / SR) - 1, 0)


def at_hz(points, hz):
    """Curve read on a log-frequency axis."""
    points_hz, values = np.transpose(points)
    return np.interp(np.log(hz + 1), np.log(points_hz), values)


def noise(spectrum):
    """Coloured noise, rms 1."""
    white = rfft(rng.standard_normal(N))
    gain = from_db(at_hz(spectrum, np.linspace(0, SR / 2, len(white))))
    return rms_one(irfft(white * gain, N))


def drift(rate_hz):
    """Slow random wander, rms 1."""
    r = np.exp(-80 * np.pi * rate_hz / SR)
    slow = signal.lfilter([1], [1, -2 * r, r * r], rng.standard_normal(N // 40 + 2002))[2000:]
    return np.interp(np.arange(N) / 40, np.arange(len(slow)), rms_one(slow))


def butter(x, order, hz, kind="low"):
    return signal.sosfilt(signal.butter(order, hz, kind, fs=SR, output="sos"), x + 1e-18)


def resonate(x, hz, width_hz):
    """One resonance, peak gain 1."""
    r = np.exp(-np.pi * width_hz / SR)
    feedback = [1, -2 * r * np.cos(2 * np.pi * hz / SR), r * r]
    return signal.lfilter([(1 - r * r) / 2, 0, (r * r - 1) / 2], feedback, x + 1e-18)


def resonate_twice(x, hz, width_hz):
    return resonate(resonate(x, hz, width_hz), hz, width_hz)


def coupling(hz, contact_hz, db_per_octave):
    """A mode is driven harder the nearer it lies to the contact pitch."""
    return from_db(-db_per_octave * np.abs(np.log2(hz / contact_hz)))


def strike(age_s, db, t60_s, rise_s):
    """Envelope: quick rise, exponential decay."""
    return from_db(db - 60 * age_s / t60_s) * (1 - np.exp(-(age_s / rise_s) ** 2))


def bursts(times_s, levels_db, t60_s, rise_s):
    """Sum of strike envelopes."""
    out = np.zeros(N)
    for s, db, t60, rise in np.broadcast(times_s, levels_db, t60_s, rise_s):
        start = round(s * SR)
        age_s = np.arange(min(round(t60 * SR) + 2, N - start)) / SR
        out[start:start + len(age_s)] += strike(age_s, db, t60, rise + 1e-4)
    return out


def band_noise(envelope, hz, width_hz):
    """Resonant noise under an envelope of up to 0.25 s."""
    band = rms_one(resonate_twice(rng.standard_normal(SR // 4 + 500), hz, width_hz))
    return envelope * band[500:500 + len(envelope)]


def hollow_knocks(times_s, levels_db, t60_s, rise_s, pitch_hz, width_ratio):
    """Each knock rings one broad resonance."""
    out, age_s = np.zeros(N + SR), np.arange(SR // 4) / SR
    for s, db, t60, rise, hz in np.broadcast(times_s, levels_db, t60_s, rise_s, pitch_hz):
        start = round(s * SR)
        out[start:start + len(age_s)] += band_noise(strike(age_s, db, t60, rise), hz, width_ratio * hz)
    return out[:N]


def scene():
    """Motorcycle slightly left in the garage; the pipe points out of the open door."""
    pipe = exhaust()
    metal = crankcase() + valves() + spring() + lever() + valve_ticks()
    room = garage(metal + from_db(-14) * pipe, wet_db=-5, side_db=1)
    # the microphones differ in the deep bass
    bass_side = from_db(-13) * signal.lfilter([.007], [1, -.993], pipe) * [[1], [-1]]
    return (pipe + bass_side + metal + room + background()) * from_db([[.4], [-.4]])


def record(dry):
    """Loud bright clacks duck the bass, which recovers steadily; peaks clip and the top is cut."""
    threshold_db, max_cut_db, release_db_per_s, stopband_hz = -22.3, 26, 130, 16150
    clack = butter(np.mean(dry, axis=0), 4, 6000, "high")
    power = uniform_filter1d(clack ** 2, size=SR // 50, origin=SR // 100 - 1)
    cut_db = np.clip(14 * (10 * np.log10(power + 1e-12) - threshold_db), 0, max_cut_db)
    ramp_db = release_db_per_s * np.arange(N) / SR
    held_db = np.maximum.accumulate(cut_db + ramp_db) - ramp_db
    gain = from_db(-uniform_filter1d(held_db, size=SR // 100, origin=SR // 200 - 1))
    bass = butter(dry, 2, 1900)
    clipped = np.clip(dry + (gain - 1) * bass, -.88, .88)
    return signal.sosfilt(signal.cheby2(14, 60, stopband_hz, fs=SR, output="sos"), clipped)


dry = scene()
out = record(dry)
bounce(out)
```